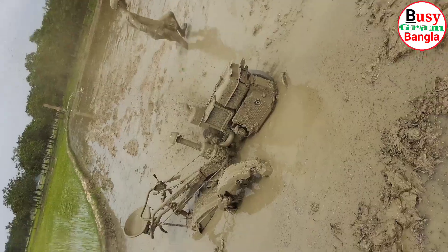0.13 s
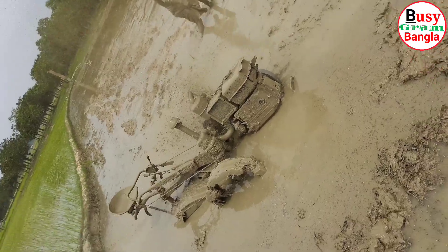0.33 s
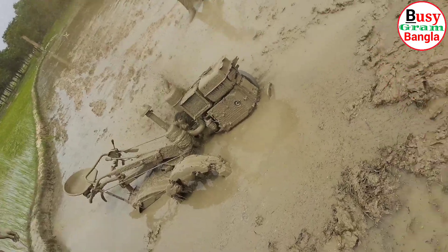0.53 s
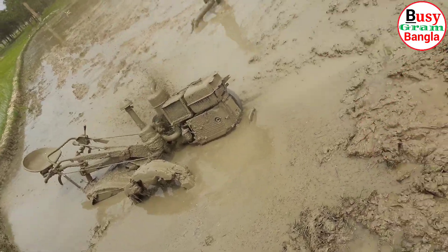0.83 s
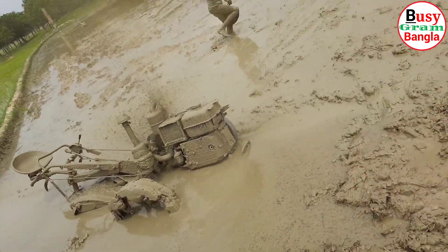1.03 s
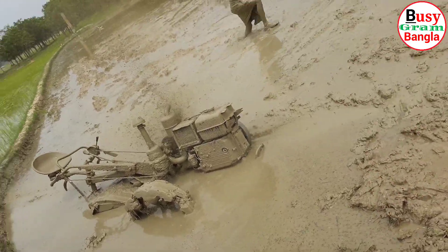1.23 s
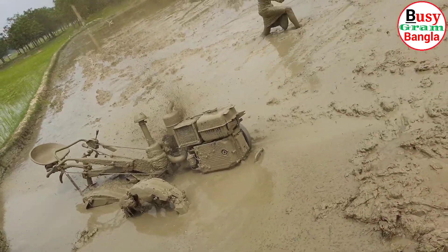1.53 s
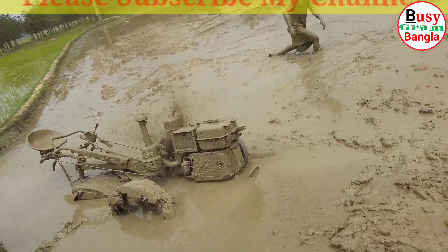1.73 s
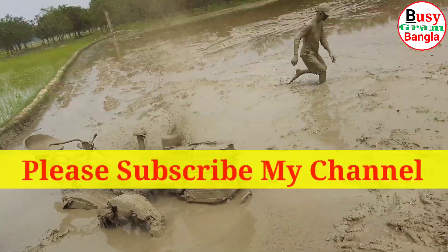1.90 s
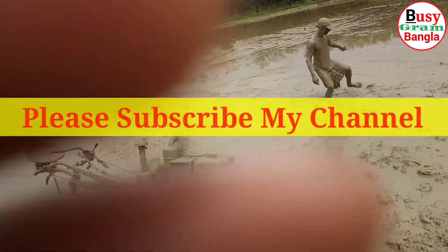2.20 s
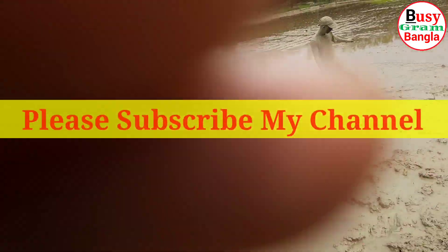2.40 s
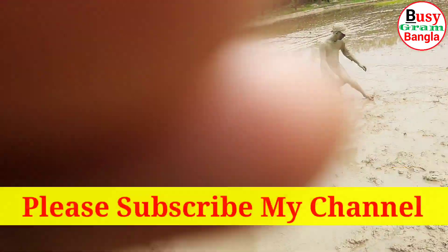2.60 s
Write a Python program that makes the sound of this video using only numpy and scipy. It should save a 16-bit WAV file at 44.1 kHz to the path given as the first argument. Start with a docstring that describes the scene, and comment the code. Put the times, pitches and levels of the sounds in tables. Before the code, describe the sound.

Fast, steady chugging of a small diesel engine, loose metal rattling, brief handling scuffs near the end

```python
"""In a flooded field a single-cylinder diesel tiller idles before a hand-held camera with two microphone ports.
The take fades in just before a firing; from then on every firing gives a low exhaust puff, and valves and
loose sheet metal knock in step with the crank over a dense rattle, a rumble and a faint treble hiss.
The engine slows a little and its parts change in level as the camera turns. Later one panel sings out on a
narrow note, and fingers slide over the camera body. Noise and struck resonances make the metal."""
import sys
import numpy as np
from scipy import signal
from scipy.fft import rfft, irfft, next_fast_len
from scipy.io import wavfile
from scipy.ndimage import uniform_filter1d, map_coordinates

SR = 44100
rng = np.random.default_rng(int(sys.argv[2]) if len(sys.argv) > 2 else 0)


def wav_out(sig):
    """Save sig, one row per channel (or a flat mono array), as 16-bit PCM at SR to the path in sys.argv[1]."""
    wavfile.write(sys.argv[1], SR, np.round(np.clip(np.atleast_2d(sig).T, -1, 1) * 32767).astype(np.int16))


N = 121275  # length in samples

# Crank timing: a firing, the cycle length there, and its growth per cycle
FIRST_FIRING_S, CYCLE_S, CYCLE_GROWTH_S = .2832, .12048, .00008

# Knocks of every cycle [t/s after firing, level/dB in the hood, level/dB in the other parts]
CYCLE_KNOCKS = [(-.060, 7, -3), (-.045, -5, 4), (-.040, 8, 0), (-.032, 4, 3), (-.025, 4, 0), (.003, 2, -4),
                (.010, -4, 3), (.024, -1, 4), (.042, -2, 0)]
# Widest departures of those knocks: shared by all parts, per part, and in time
KNOCK_SCATTER_DB, KNOCK_PART_SCATTER_DB, KNOCK_JITTER_S = 2.5, 1.5, .001
# Loudest single knocks [t/s, level/dB before the gain into each part]
LOUD_KNOCKS = [(0.3039, -6.5), (0.4294, -4), (0.478, -6.5), (0.5806, -6), (0.609, -5.5), (0.7015, -9.5),
               (0.7196, -8.5), (0.8445, -8), (0.9644, -6.5), (1.011, -10), (1.0292, -11), (1.087, -9),
               (1.0963, -14.5), (1.3162, -9.5), (1.4274, -10.5), (1.5776, -11.5), (1.791, -16),
               (1.8106, -15), (1.8794, -7.5), (2.4267, -19), (2.5514, -7.5), (2.7155, -12)]
# Gain of the loudest knocks into tank, hood, block, valves [gain/dB]
LOUD_KNOCK_GAIN_DB = [2, 10, 14, 17]
# Lowest level of the loose, random knocks in tank, hood, block, valves [level/dB]
LOOSE_KNOCK_DB = [-9, -15, -9, -9]
LOOSE_PER_S, LOOSE_SPREAD_DB = 150, 6  # the spread is added by two draws, one shared and one per part
# Steady shaking of tank, hood, block, valves under the knocks [level/dB]
STEADY_SHAKE_DB = [6, -7.5, -1.5, -7.5]
# Decay time of the chatter in tank, hood, block, valves [t/s]
CHATTER_DECAY_S = [.012, .004, .004, .004]
CHATTER_RISE_S, CONTACT_DB = .0007, -1  # the contact's level is set against the chatter that follows it

# Resonances of the fuel tank [f/Hz, width/Hz, level/dB]
TANK_MODES = [(268, 113, -3.5), (350.4, 46.6, 2)]
# Resonances of the sheet-metal hood [f/Hz, width/Hz, level/dB]
HOOD_MODES = [(599, 86, -11), (699.5, 58, -4), (768.4, 100, -1), (900, 265, -8)]
# Resonances of the engine block [f/Hz, width/Hz, level/dB]
BLOCK_MODES = [(1293, 460, -6.5), (1659, 440, -3.5), (2151, 120, 3), (2327, 208, -2.5)]
# Resonances of the valve gear [f/Hz, width/Hz, level/dB]
VALVE_MODES = [(2721, 242, 4), (3300, 860, -3.5), (3830, 288, 2), (4493, 207, 0.5), (5200, 860, -9),
               (6460, 370, -7.5), (7600, 740, -19.5)]
# The single narrow note of one panel [f/Hz, width/Hz, level/dB]
PANEL_MODE = [(677, 13, 0)]
ENGINE_DARK_ABOVE_HZ = 8820
MODE_SWELL_DB, MODE_SWELL_PER_S = 1.3, 25  # each resonance swells and sinks on its own

# The parts as the camera turns [t/s, hood level/dB, block level/dB, valve level/dB,
# extra valve treble level/dB, block left minus right/dB]
CAMERA_TURN = [(.25, -25.5, -27, -33.5, 2.5, 4), (.55, -25.5, -26.5, -30.5, -9.5, -1),
               (.8, -24.5, -24, -27.5, -5, 0), (1.1, -26, -27.5, -24.5, -5.5, -3),
               (1.4, -26, -27.5, -30, 6, 1), (1.7, -27, -26, -30, 5.5, 1),
               (2.0, -25.5, -26, -28.5, 3.8, -0.5), (2.3, -26, -25.5, -26, -3, 3),
               (2.75, -27.5, -24.5, -25, -2.5, -0.5)]
VALVE_TREBLE_HZ = 5000  # the extra valve treble lies above
# Tank as heard at the camera [t/s, level/dB]
TANK_LEVELS = [(.25, -34), (1, -35.5), (2.75, -39.5)]
# Singing panel as heard at the camera [t/s, level/dB]
PANEL_LEVELS = [(.25, -30.5), (1.58, -30), (1.64, -17.5), (1.8, -28.5), (1.9, -21.5), (2.0, -27),
                (2.75, -27.5)]
# Place of hood and panel between the ports [t/s, left minus right/dB]
HOOD_BALANCE = [(.25, -7), (2.75, -11.5)]

# Exhaust puffs before their scatter [t/s, peak level/dB]
PUFF_LEVELS = [(.28, -17), (.9, -20), (1.6, -18.5), (2.1, -19.5), (2.75, -20.5)]
PUFF_HZ, PUFF_SWELL_S, PUFF_STOP_S, PUFF_TOP_S = 111.1, .0089, .004, .001
PUFF_SCATTER_DB = 1.4  # standard deviation
# Hum of the exhaust pipe after each puff [f/Hz, level/dB relative to the puff, 60 dB decay t/s]
PIPE_HUM = [(58.1, -32.5, 1), (74.5, -20.5, 0.69)]

# Fingers on the casing, by their treble [t/s, level/dB]
RUB_LEVELS = [(1.87, -49), (1.94, -39), (2.014, -41), (2.022, -60), (2.058, -73), (2.07, -49),
              (2.19, -38.5), (2.26, -47), (2.325, -52.5), (2.335, -53)]
# Colour of skin on the casing [f/Hz, density level/dB per Hz]
SKIN_COLOUR = [(1200, -43), (2800, 15), (4500, 18.5), (8500, -13), (13000, -3)]
RUB_BALANCE_DB, GRIT_DB, GRIT_SMOOTH_S = 7, 1.8, .002  # left minus right; rms of the grit

# Colour of the low rumble [f/Hz, density level/dB per Hz]
RUMBLE_COLOUR = [(30, -6), (160, 0), (500, -60)]
# Colour of the faint treble hiss [f/Hz, density level/dB per Hz]
AIR_COLOUR = [(6000, -23), (9000, 2.5), (12000, 11), (15500, 10)]
RUMBLE_DB, AIR_DB = -40.5, -55.5
AIR_FOLLOWS = .82  # exponent by which the hiss follows the valves' shaking

# Likeness of the two ports [f/Hz, left-right likeness]
PORT_LIKENESS = [(60, .985), (700, .97), (2000, .8), (4000, .6), (8000, .1)]
# Lean of the two ports [f/Hz, left minus right/dB]
PORT_LEAN = [(350, -1), (700, 13.5), (1300, 1.5), (2300, -8.5), (4400, -6.5)]
# Delay of the left port behind the right [f/Hz, phase/rad]
PORT_LAG = [(100, 0.066), (700, 0.34), (1800, 1.5), (3900, 1.42), (4800, 4.17)]
# Fade-in of the whole take [t/s, level/dB]
FADE_IN = [(.16, -121), (.17, -24), (.19, -3), (.25, 4.5)]
MIC_LOW_HZ, MIC_TOP_HZ, CEILING = 48, 15550, 1


def amp(db):
    """Amplitude factor of a level in dB."""
    return 10 ** (np.asarray(db) / 20)


def unit(x):
    """The signal scaled to rms 1."""
    return x / np.sqrt(np.mean(x ** 2) + 1e-20)


def along(points, hz):
    """Values between (f/Hz, value) points on a log frequency axis."""
    f, v = np.transpose(points)
    return np.interp(np.log(hz + 1), np.log(f + 1), v)


def curves(rows):
    """One value per sample for each column after the time."""
    s, *cols = np.transpose(rows)
    return [np.interp(np.arange(N) / SR, s, c) for c in cols]


def filtered(x, response):
    """The signal through a complex response of frequency."""
    m = next_fast_len(N + SR // 2)
    return irfft(rfft(x, m) * response(np.fft.rfftfreq(m, 1 / SR)), m)[..., :N]


def panned(pair, db):
    """Left raised and right lowered by half of db each."""
    return pair * amp(np.array([db / 2, -db / 2]).reshape(2, -1))


def struck(times, gains, shape, lead=0):
    """The shape placed at each time, starting lead samples early."""
    at = np.round(np.asarray(times) * SR).astype(int)
    keep = (at >= 0) & (at < N)
    impulses = np.bincount(at[keep], gains[keep], N)
    return signal.fftconvolve(impulses, shape)[lead:lead + N]


def ports(pair):
    """Two signals, middle and side, mixed to the likeness, lean and lag of the two microphone ports."""
    def middle_and_side(hz):
        angle = np.arccos(np.clip(along(PORT_LIKENESS, hz), -1, 1)) / 2
        return np.array([np.cos(angle), np.sin(angle)])

    def left_and_right(hz):
        half = amp(along(PORT_LEAN, hz) / 2) * np.exp(-1j * along(PORT_LAG, hz) / 2)
        return np.array([half, 1 / half])

    mid, side = filtered(pair, middle_and_side)
    return filtered(np.array([mid + side, mid - side]), left_and_right)


def hiss(spectrum):
    """Two channels of coloured noise, rms 1 together."""
    noise = rng.standard_normal((2, N))
    return unit(filtered(noise, lambda hz: amp(along(spectrum, hz))))


def firings():
    """Firing times: each cycle lasts a little longer than the one before."""
    k = np.arange(-2, 22)
    return FIRST_FIRING_S + CYCLE_S * k + CYCLE_GROWTH_S * k * k / 2


def engine():
    """Tank, hood, panel, block and valve gear ring as they are shaken; a treble hiss follows the valves."""
    tank, hood, block, valves = knocking()
    hood_db, block_db, valves_db, treble_db, block_balance = curves(CAMERA_TURN)
    tank_sound = amp(curves(TANK_LEVELS)[0]) * ringing(*tank, TANK_MODES)
    hood_sound = amp(hood_db) * ringing(*hood, HOOD_MODES)
    panel_sound = amp(curves(PANEL_LEVELS)[0]) * ringing(*tank, PANEL_MODE)  # shaken like the tank
    sheet_metal = panned(hood_sound + panel_sound, curves(HOOD_BALANCE)[0])
    block_sound = amp(block_db) * panned(ringing(*block, BLOCK_MODES), block_balance)
    gear = ringing(*valves, VALVE_MODES)
    gear_treble = filtered(gear, lambda hz: 1 - 1 / (1 + (hz / VALVE_TREBLE_HZ) ** 8))
    valve_sound = amp(valves_db) * (gear + (amp(treble_db) - 1) * gear_treble)
    return tank_sound + sheet_metal + block_sound + valve_sound + treble_air(valves[0])


def knocking():
    """How each part is shaken: every knock is a sharp contact, then chatter that rises and dies away."""
    beats, fire = np.array(CYCLE_KNOCKS, float), firings()
    draw = rng.uniform(-1, 1, (len(fire), len(beats), 6))  # time, shared level, four part levels
    beat_s = (fire[:, None] + beats[:, 0] + KNOCK_JITTER_S * draw[..., 0]).ravel()
    loose = rng.random((N // 100, 6))  # gap, shared level, four part levels
    loose_s = np.cumsum(-np.log(1 - loose[:, 0])) / LOOSE_PER_S
    loud_s, loud_db = np.transpose(LOUD_KNOCKS)
    times = np.concatenate([beat_s, loose_s, loud_s])
    t = np.arange(SR // 20) / SR
    parts = []
    for k, decay in enumerate(CHATTER_DECAY_S):
        beat_db = beats[:, 1 if k == 1 else 2] + KNOCK_SCATTER_DB * draw[..., 1]
        beat_db = beat_db + KNOCK_PART_SCATTER_DB * draw[..., 2 + k]
        loose_db = LOOSE_KNOCK_DB[k] + LOOSE_SPREAD_DB * (loose[:, 1] + loose[:, 2 + k])
        db = np.concatenate([beat_db.ravel(), loose_db, loud_db + LOUD_KNOCK_GAIN_DB[k]])
        chatter_shape = np.exp(-2 * t / decay) * (1 - np.exp(-t / CHATTER_RISE_S))
        chatter_power = struck(times, amp(2 * db), chatter_shape)
        shake = np.sqrt(np.abs(chatter_power) + amp(2 * STEADY_SHAKE_DB[k]))
        contact = struck(times, amp(db + CONTACT_DB) * np.sqrt(decay * SR / 2), [1])
        parts.append((shake, contact))
    return parts


def ringing(shake, contact, modes):
    """Contacts and noisy chatter drive a part's resonances, heard at both ports, rms 1."""
    force = shake * rng.standard_normal((2, N))
    force[0] += contact  # the contact is in the middle signal only

    def outside_cut(f):
        low_cut = (1j * f / (1j * f + 0.77 * modes[0][0])) ** 2
        high_cut = 1 / (1 + 1j * f / (1.48 * modes[-1][0])) ** 2
        return low_cut * high_cut / (1 + (f / ENGINE_DARK_ABOVE_HZ) ** 24)

    total = 0
    for k, (centre, width, db) in enumerate(modes):
        swell = map_coordinates(rng.standard_normal(N // 100), [np.arange(N) * MODE_SWELL_PER_S / SR])
        driven = force * amp(db + MODE_SWELL_DB * swell)
        sign = (-1) ** k  # neighbouring resonances have opposite signs
        total = total + filtered(
            driven, lambda f: sign * 1j * f * width / (centre * centre - f * f + 1j * f * width))
    return unit(ports(filtered(total, outside_cut)))


def exhaust():
    """Each firing gives a low tone that swells and stops short, then the decaying hum of the pipe."""
    fire, half = firings(), SR // 2
    t = np.arange(-half, half) / SR
    u = t - PUFF_TOP_S
    swell = np.exp(np.minimum(u, 0) / PUFF_SWELL_S)
    stop = np.exp(-(u / PUFF_STOP_S) ** 2 / 2)
    shape = np.where(u < 0, swell, stop) * np.sin(2 * np.pi * PUFF_HZ * t)
    for hz, db, t60 in PIPE_HUM:
        decay = (t > 0) * amp(db - 60 * np.abs(t) / t60)
        shape = shape + decay * np.sin(2 * np.pi * hz * t)
    scatter_db = PUFF_SCATTER_DB * rng.standard_normal(len(fire))
    size = amp(np.interp(fire, *np.transpose(PUFF_LEVELS)) + scatter_db)
    puffs = struck(fire, size, shape, lead=half)
    return ports(np.array([puffs, puffs]))


def fingers():
    """Skin slides on the casing, nearer the left port: coloured noise made uneven by a quick random grit."""
    roughness = uniform_filter1d(rng.standard_normal(N), round(GRIT_SMOOTH_S * SR))
    grit = amp(GRIT_DB * unit(roughness))
    rub = unit(grit) * hiss(SKIN_COLOUR)
    treble_rms = filtered(rub, lambda hz: hz > 10000).std()  # the level table speaks of this treble
    level = amp(curves([(0, -99), *RUB_LEVELS, (3, -99)])[0])
    return level * panned(rub, np.array(RUB_BALANCE_DB)) / treble_rms


def low_rumble():
    """Steady low noise as the two ports hear it."""
    return amp(RUMBLE_DB) * ports(hiss(RUMBLE_COLOUR))


def treble_air(valve_shake):
    """Faint treble noise that rises and falls with the shaking of the valves."""
    return amp(AIR_DB) * unit(valve_shake ** AIR_FOLLOWS * hiss(AIR_COLOUR))


def scene():
    """Engine and exhaust, fingers on the camera, and the rumble behind."""
    return engine() + exhaust() + fingers() + low_rumble()


def record(dry):
    """The camera's microphones: bass cut, soft ceiling, fade-in and band limit."""
    x = filtered(dry, lambda hz: 1 - 1 / (1 + (hz / MIC_LOW_HZ) ** 4))
    x = x / (1 + np.abs(x / CEILING) ** 4) ** (1 / 4)
    return filtered(x * amp(curves(FADE_IN)[0]), lambda hz: hz < MIC_TOP_HZ)


dry = scene()
out = record(dry)
wav_out(out)
```